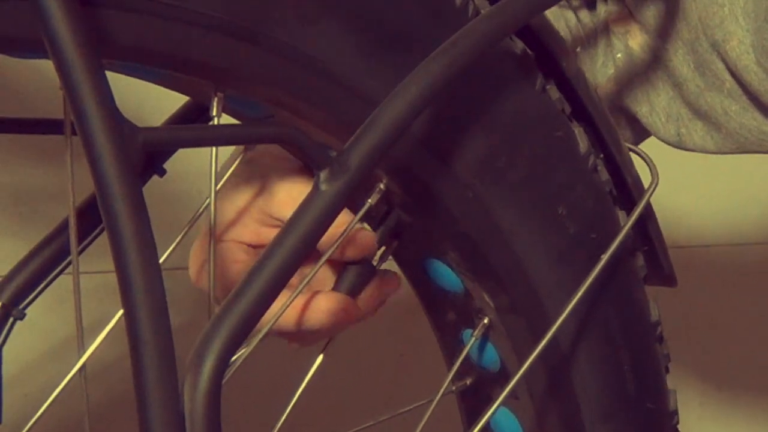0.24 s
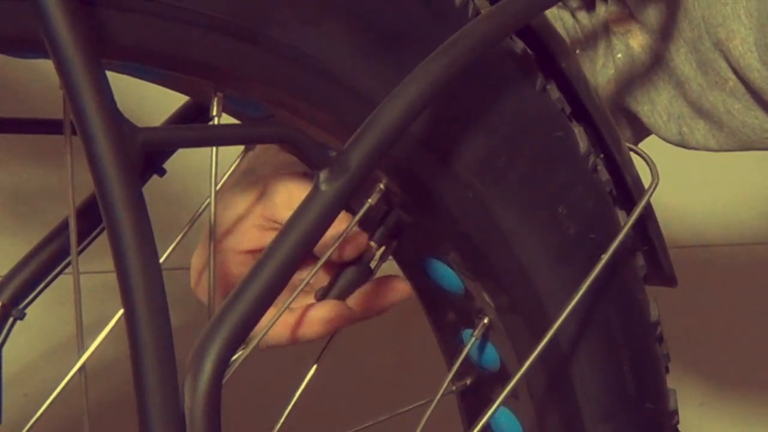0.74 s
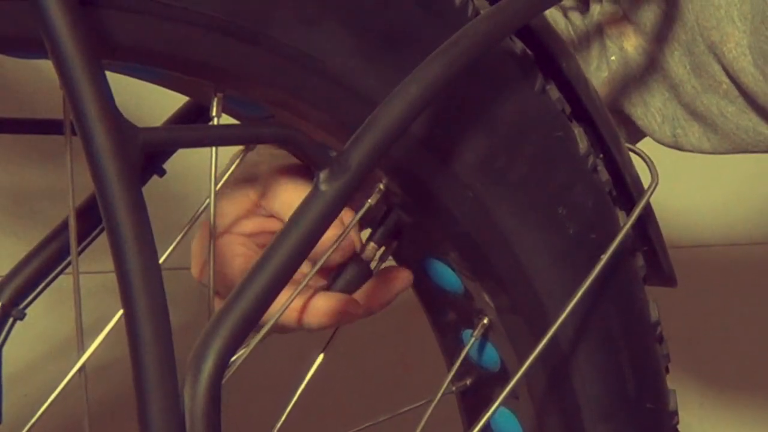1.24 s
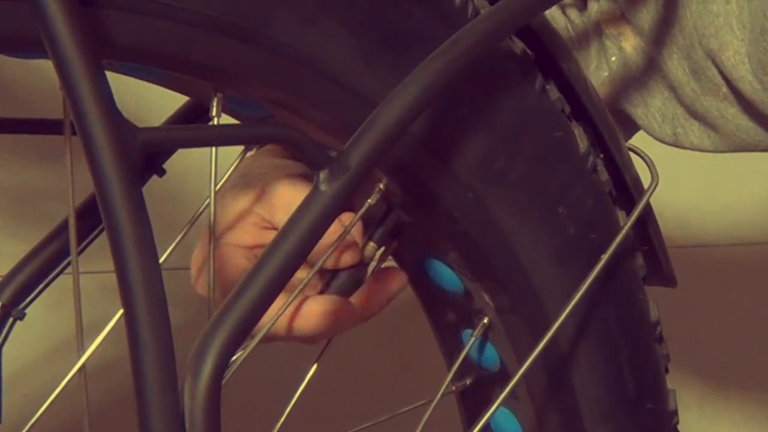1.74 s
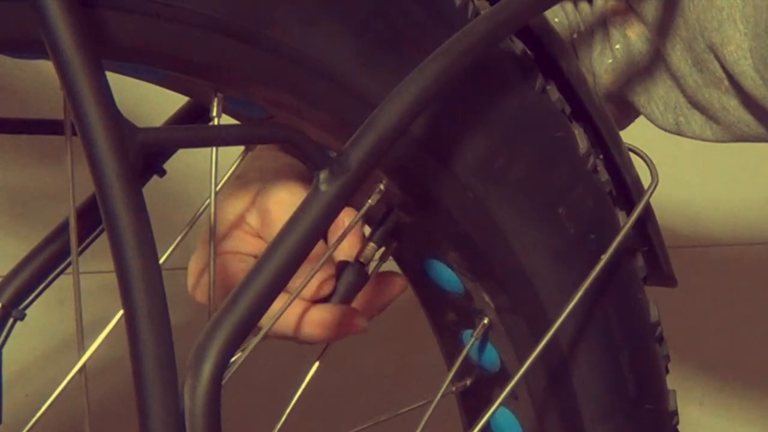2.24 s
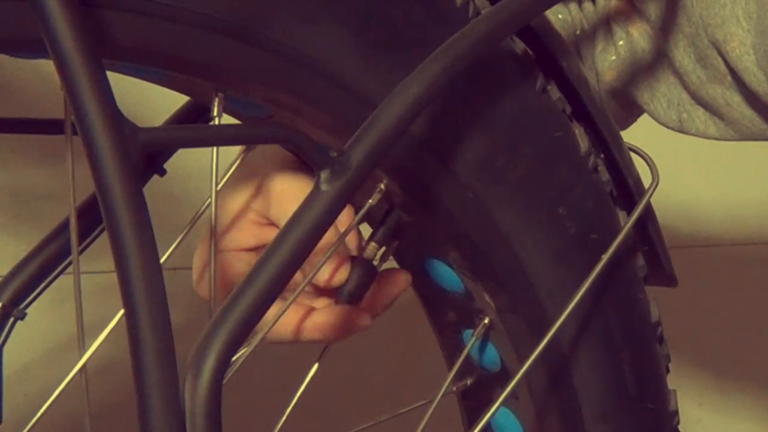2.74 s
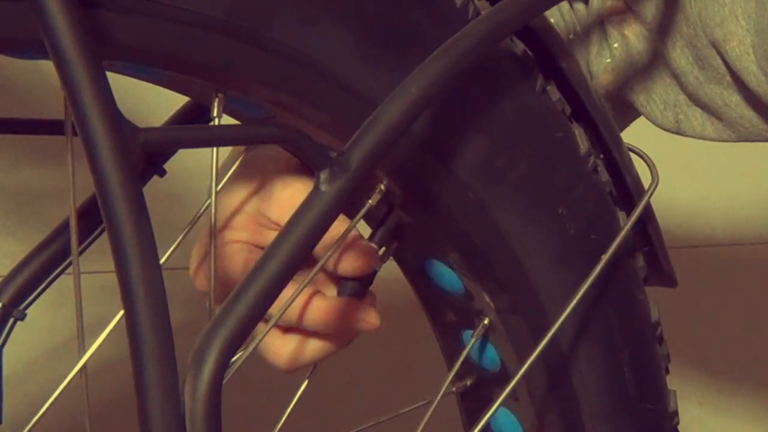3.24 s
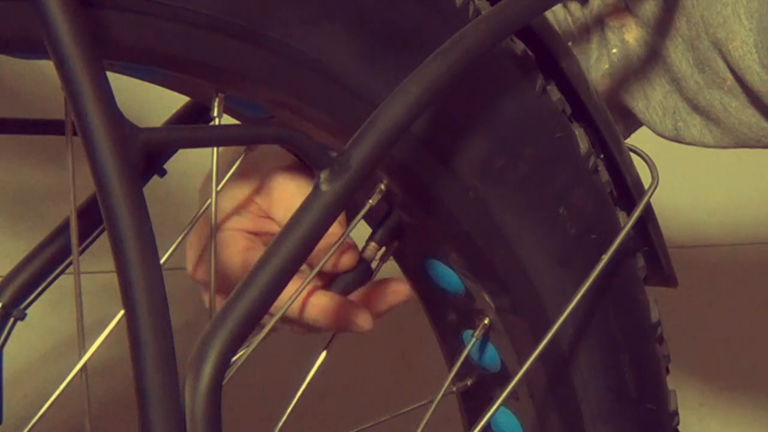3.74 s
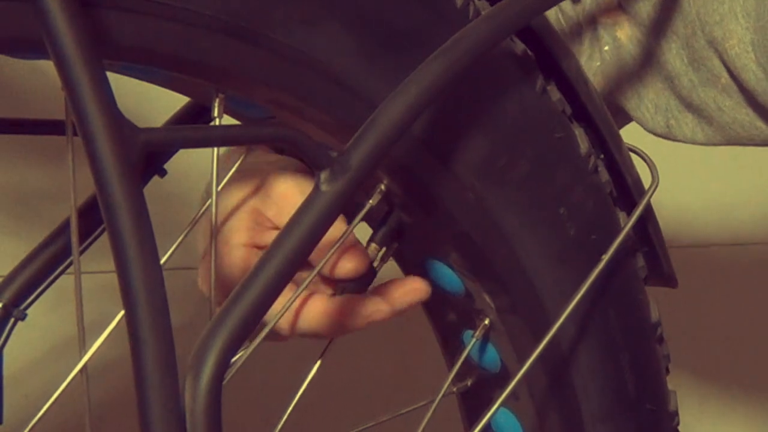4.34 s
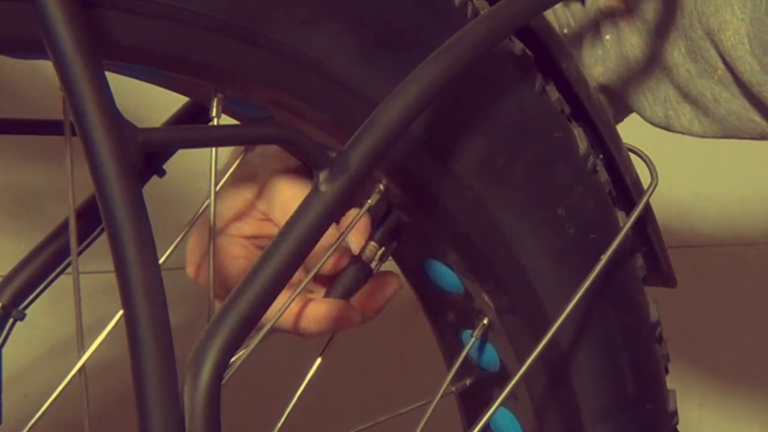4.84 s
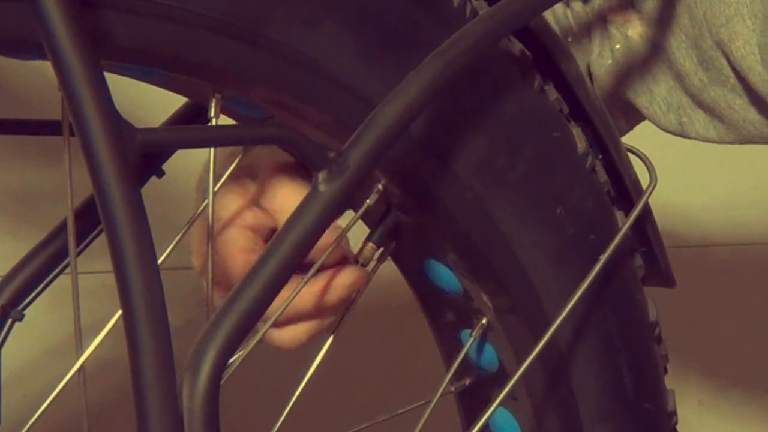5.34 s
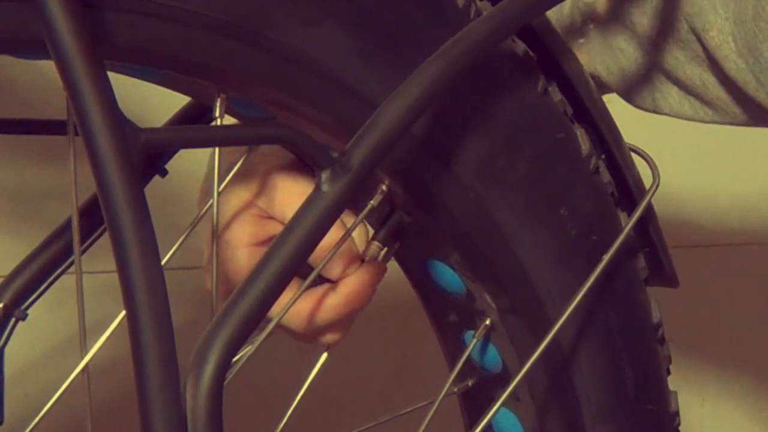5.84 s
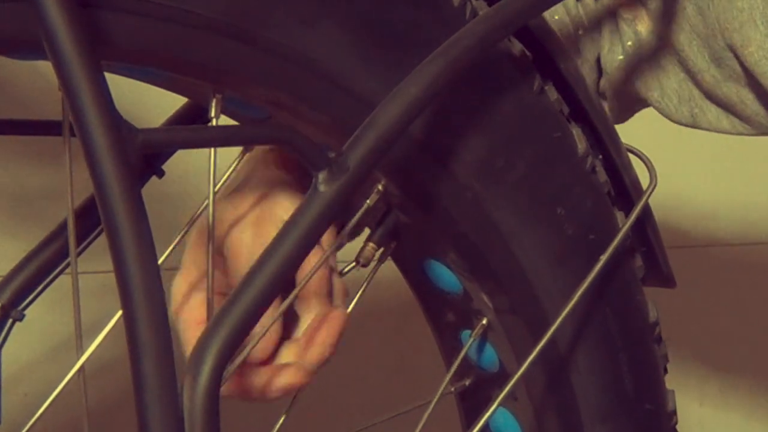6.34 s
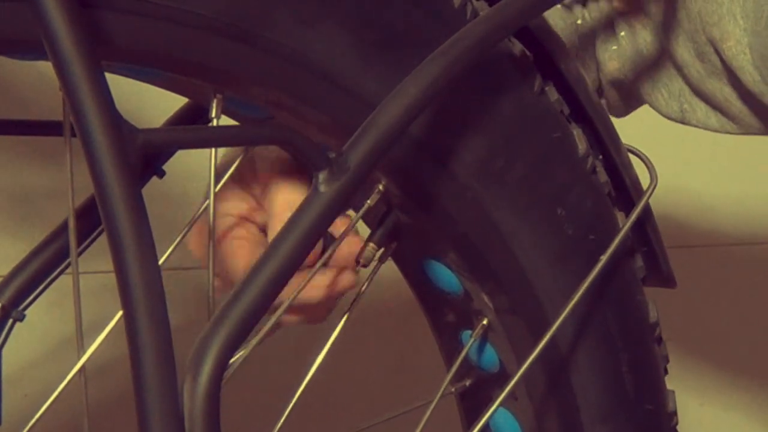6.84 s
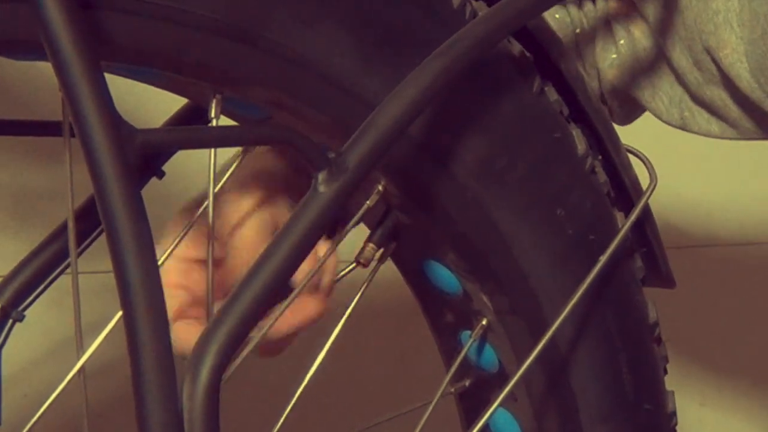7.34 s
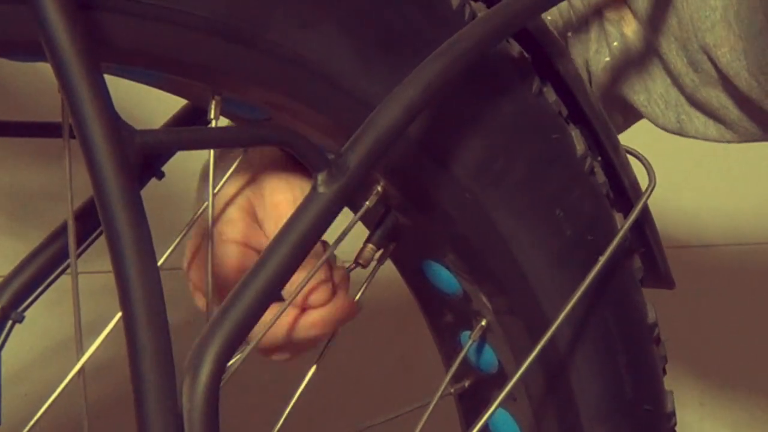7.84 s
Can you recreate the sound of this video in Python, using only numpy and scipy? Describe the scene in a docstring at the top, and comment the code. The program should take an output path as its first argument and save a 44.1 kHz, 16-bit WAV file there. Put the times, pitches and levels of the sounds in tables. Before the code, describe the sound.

Air escapes from a bicycle tire valve in a high, fluttering hiss with a faint breathy whistle while a small tool unscrews the core. A few light metal ticks and spoke taps sound over it. Past the middle, the jet splutters and shifts in tone as fingers get in its way, then grows strongest at the end. It is heard close up, over a faint low workshop rumble.

```python
"""Air escapes from a bicycle tire valve while fingers unscrew its core with a small tool.
From the start the jet hisses through the cavities of valve and tool, with a breathy stem note and two
edge tones, over a workshop's rumble. From 0.6 s the hand taps a spoke; from 1.5 s the tool ticks on the
valve. From 4.6 s the jet splutters where fingers deflect it, and at 5.3 s the tool comes off. Near 8 s
the rumble has faded and the freed jet is at its strongest."""
import sys
import numpy as np
from scipy import signal
from scipy.fft import rfft, irfft, next_fast_len
from scipy.io import wavfile
from scipy.ndimage import uniform_filter1d, map_coordinates

SR = 44100
rng = np.random.default_rng(int(sys.argv[2]) if len(sys.argv) > 2 else 0)


def generate_wav(signal):
    """Clip the signal to [-1, 1] and save it as 16-bit WAV at the path in sys.argv[1]."""
    frames = np.transpose(np.atleast_2d(signal))
    scaled = np.clip(frames, -1, 1) * 32767
    pcm = np.round(scaled).astype(np.int16)
    wavfile.write(sys.argv[1], SR, pcm)


N = 356239
FRAME, HOP = 256, 64  # samples

# slow envelopes: t/s, stem note level/dB, rumble level/dB
NOTE_AND_RUMBLE = [(0, -39, -52), (.3, -37.5, -50), (1.35, -36.5, -49), (1.62, -41.5, -55.5),
                   (2.72, -41.5, -54), (3.3, -39, -53), (4.12, -36.5, -49), (4.97, -39.5, -49.5),
                   (5.15, -43, -57), (5.92, -45.5, -56), (6.14, -44, -50.5), (6.48, -44, -46.5),
                   (6.6, -38, -51), (6.75, -42, -55.5), (7.1, -47, -55), (7.4, -45.5, -53),
                   (7.69, -41.5, -65), (7.94, -44.5, -73), (8.08, -52, -73)]
# the jet as the core comes loose: t/s, nominal level/dB of fizz, of cavity, of rush
JET_LEVELS = [(0, -37, -34, -43.5), (.25, -33, -30, -39.5), (1.15, -33, -31.5, -41),
              (1.3, -27.5, -26.5, -37.5), (1.5, -19.5, -25, -34), (1.72, -21.5, -21.5, -31.5),
              (1.77, -17, -30, -36), (2.22, -21.5, -28.5, -40.5), (2.27, -22, -33, -40),
              (2.53, -26, -31.5, -40), (2.6, -36.5, -37.5, -45), (3.0, -32, -32, -41.5),
              (3.44, -32, -36.5, -42), (3.52, -28.5, -29.5, -38.5), (4.4, -23, -25.5, -35.5),
              (4.5, -29, -30, -39), (4.58, -26, -26, -34), (4.85, -27, -23.5, -37),
              (5.0, -24.5, -23, -29.5), (5.26, -26, -20.5, -27.5), (5.33, -24.5, -29.5, -30.5),
              (5.58, -20, -27, -37), (5.8, -23.5, -32.5, -44.5), (6.0, -20, -28.5, -39.5),
              (6.13, -28, -33, -39), (6.28, -28.5, -37, -44.5), (6.52, -27.5, -35, -43.5),
              (6.9, -27.5, -30.5, -40.5), (7.07, -22, -29.5, -40.5), (7.3, -21.5, -29.5, -41),
              (7.4, -20.5, -25.5, -33.5), (7.5, -22, -23, -29.5), (7.77, -22.5, -20, -25),
              (7.85, -20, -26, -25.5), (8.08, -15, -18.5, -22.5)]
# tool or finger presses the core and chokes the flow: t/s, duration/s, nominal gain/dB
FLOW_CHOKES = [(.88, 0.086, -3), (1.36, 0.11, -6.5), (2.455, 0.042, -9), (3.04, .04, -3.5),
               (3.165, 0.042, -5.5), (3.44, 0.034, -5.5), (3.93, 0.093, -4.5), (4.47, .02, -8),
               (4.51, .03, -10), (4.68, 0.019, -5), (5.42, .11, -8), (5.488, .035, -4), (6.04, .015, -1),
               (6.728, .008, -4), (6.85, 0.06, -5.5), (6.945, 0.051, -4.5), (7.292, .012, -8),
               (7.335, 0.029, -12.5)]


def amp(db):
    """Amplitude ratio of a level in decibels."""
    return 10 ** (np.asarray(db) / 20)


def along(points, hz):
    """Interpolation of (f/Hz, value) points on a logarithmic frequency axis."""
    f, values = np.transpose(points)
    return np.interp(np.log(hz + 1), np.log(f + 1), values)


def curves(rows, t):
    """Linear interpolation in time of each column after the first."""
    times, *columns = np.transpose(rows)
    return [np.interp(t, times, column) for column in columns]


def plateaus(rows, t, rise_s=.005, fall_s=.0084):
    """Superposed smooth-edged pulses, one sum for each column after start and duration."""
    start, duration, *heights = np.array(rows).T[:, :, None]
    gate = (np.tanh((t - start) / rise_s) - np.tanh((t - start - duration) / fall_s)) / 2
    return [(height * gate).sum(0) for height in heights]


def wobble(rate, t):
    """Smooth random modulation: a spline through `rate` Gaussian knots a second."""
    return map_coordinates(rng.standard_normal(int(t[-1] * rate) + 4), [t * rate])


def filtered(x, response):
    """Linear filtering: the spectrum is multiplied by a frequency response."""
    size = next_fast_len(N + SR // 2)
    return irfft(rfft(x, size) * response(np.fft.rfftfreq(size, 1 / SR)), size)[..., :N]


def bell(hz, centre_hz, width_hz):
    """Lorentzian resonance curve, 1 at its centre; the width is taken at half height."""
    return 1 / (1 + (2 * (hz - centre_hz) / width_hz) ** 2)


def stereo_noise():
    """Partial coherence: sum and difference of two independent noises give two white channels."""
    # likeness of left and right: f/Hz, correlation coefficient
    correlation = [(40, -0.69), (70, -0.4), (130, 0.4), (290, 0.6), (640, .86), (1200, 0.96), (2300, .97),
                   (2800, 1), (12200, 1), (12900, 0.93)]

    def weights(hz):
        angle = np.arccos(np.clip(along(correlation, hz), -1, 1)) / 2
        return np.array([np.cos(angle), np.sin(angle)])

    mid, side = filtered(rng.standard_normal((2, N)), weights)
    return np.array([mid + side, mid - side])


def coloured_noise(power):
    """Stationary stereo noise of unit rms, shaped by a power spectrum."""
    noise = filtered(stereo_noise(), lambda hz: np.sqrt(power(hz)))
    return noise / noise.std()


def air_jet():
    """Source and filter: turbulence excites cavities whose resonances move with tool and fingers."""
    # four bands of jet noise, highest first: f/Hz, relative spectral level/dB
    fizz_band = [(5000, -46), (8500, -26), (9250, -23), (10000, -0.5), (10900, -1), (11400, 1.5),
                 (12100, 4.5), (13200, 0.5), (14600, -1), (15200, 0), (16000, 1.5)]
    cavity_band = [(4500, -21.5), (5300, -4), (6500, -5), (8000, -1.5), (9500, -2), (10500, -5.5)]
    rush_band = [(1000, -70), (1900, -7), (2400, 1), (3100, -2), (3900, 0.5), (4700, -1), (5600, -2),
                 (6500, 3.5), (8000, -65)]
    splutter_band = [(120, -70), (300, -20), (480, -4.5), (750, -2), (1200, 1.5), (1600, 1), (2200, 7),
                     (3200, -49)]
    # air thrown against tool and fingers: t/s, duration/s, nominal gain/dB of fizz, of rush, of splutter
    spurts = [(1.21, .015, 8, 6, 0), (1.93, 0.065, -2, 4, -4), (2.8, .025, 9, 1, 0),
              (2.98, 0.027, 2, 3.5, 9), (3.13, 0.028, 4, 1.5, -2), (3.7, .04, 5, 2, 0),
              (4.6, .09, -0.5, -0.5, 10.5), (4.707, .022, 3, 11, 23), (4.878, 0.084, 1.5, 8.5, 26),
              (4.975, 0.17, 1, 1, 16.5), (5.24, .03, 0.5, 5.5, 3), (5.37, 0.034, 7.5, 6, 10),
              (5.97, 0.058, 1.5, 12.5, 16), (6.058, 0.033, 7.5, 12, 4), (6.208, 0.014, 9, 12, 2),
              (6.1, .45, 0, 0, 3.5), (6.555, 0.031, 4, 16.5, 8), (6.583, .06, 5, 14, 11),
              (6.645, .085, 6.5, 19, 15), (6.74, .05, 7, 9, 6), (6.79, .035, 6, 15, 16),
              (6.91, .012, 8, 2, 2), (6.998, 0.029, 3, 11.5, 2), (7.03, 0.076, -0.5, 2, 11),
              (7.238, 0.057, -1.5, 1.5, 12), (7.365, .015, 3.5, 6.5, 13), (7.46, .37, 0, 0, 13),
              (7.83, .08, 0, 0, 8)]
    # gap between tool and valve: t/s, cavity f/Hz, fizz f/Hz, relative level/dB of the highest fizz
    gap = [(0, 8000, 12200, -1), (1.4, 8200, 12200, 2), (1.6, 6950, 12300, 6), (1.8, 7500, 12300, 4.5),
           (2.3, 8000, 12200, 4), (2.7, 8600, 12300, -1), (3.1, 8900, 12230, 1), (3.5, 8150, 12200, 0.5),
           (4.45, 8400, 12200, 0.5), (5.05, 8400, 12150, -12), (5.17, 6600, 12300, -3),
           (5.5, 7700, 11960, 1.5), (6.03, 7100, 11500, -1), (6.4, 7850, 11900, 1), (6.64, 8100, 11800, -7),
           (6.95, 7610, 11800, -0.5), (7.48, 6000, 11600, -2.5), (7.56, 7900, 11800, -4),
           (7.78, 8100, 11800, -7), (7.9, 6000, 11400, -7), (8.08, 7500, 11700, -7)]
    # hollow between fingers and tool: t/s, rush f/Hz, splutter f/Hz
    hollow = [(0, 2550, 750), (1.45, 2660, 750), (1.6, 4600, 900), (2.2, 3180, 890), (4.6, 2660, 600),
              (4.88, 2500, 800), (4.97, 3540, 550), (5.12, 3850, 800), (5.16, 5070, 1390),
              (5.34, 5030, 1400), (5.42, 3900, 500), (5.98, 2840, 1300), (6.5, 2800, 800),
              (6.7, 2930, 1200), (7.3, 3500, 600), (7.43, 2700, 1250), (7.6, 3100, 1200),
              (7.88, 3200, 1200), (7.96, 3900, 1500)]
    # stationary resonances of valve and tool: f/Hz, width/Hz, gain/dB
    bore = [(2190, 150, 2), (3200, 300, 2), (5600, 400, 2), (6700, 200, 3), (9640, 170, 2), (11650, 300, 2),
            (12300, 150, 2), (13200, 200, 2), (15600, 200, 3)]
    hz, t, spectrogram = signal.stft(stereo_noise(), SR, nperseg=FRAME, noverlap=FRAME - HOP)
    hz = hz[:, None]
    tool_on = t < 5.3

    fizz_db, cavity_db, rush_db = curves(JET_LEVELS, t)
    fizz_lift, rush_lift, splutter_lift = plateaus(spurts, t)
    cavity_lift = 0.49 * fizz_lift + 0.45 * rush_lift
    splutter_db = curves(NOTE_AND_RUMBLE, t)[0] - 11.5  # follows the stem note
    flutter = 0.89 * wobble(16, t) + 0.86 * wobble(35, t)  # unsteady flow, common to all bands
    flow_db = flutter + plateaus(FLOW_CHOKES, t)[0]

    cavity_hz, fizz_hz, top_db = curves(gap, t)
    rush_hz, splutter_hz = curves(hollow, t)
    top_shelf = amp(2 * top_db * np.clip((hz - 12800) / 1200, 0, 1))
    low_cut = 1 / (1 + (0.66 * rush_hz / (hz + 1)) ** 8)  # a small hollow holds no lows
    cavity_width_hz = np.where(tool_on, 840, 2200)
    bands = [(fizz_band, fizz_db + fizz_lift, top_shelf * (1 + amp(3.5) * bell(hz, fizz_hz, 1200))),
             (cavity_band, cavity_db + cavity_lift, 1 + amp(11.5) * bell(hz, cavity_hz, cavity_width_hz)),
             (rush_band, rush_db + rush_lift, low_cut * (1 + amp(5.5) * bell(hz, rush_hz, 1900))),
             (splutter_band, splutter_db + splutter_lift, 1 + amp(6.5) * bell(hz, splutter_hz, 470))]
    power = 0
    for spectrum, nominal_db, resonance in bands:
        shape = amp(2 * along(spectrum, hz)) * resonance
        flicker = 0.85 * wobble(20, t)
        turning = .6 * wobble(13, t) * tool_on  # the turning tool shakes each band's level
        level_db = 0.976 * (nominal_db + flow_db + flicker + turning)
        power = power + shape / shape.mean(0) * amp(2 * level_db)

    # the colour shimmers in random patches of frequency and time
    patches = uniform_filter1d(rng.standard_normal(power.shape), size=3, axis=0)
    patches = uniform_filter1d(patches, size=60, axis=1)
    spectrogram = spectrogram * np.sqrt(power) * amp(1.88 * patches / patches.std())
    jet = signal.istft(spectrogram, SR, nperseg=FRAME, noverlap=FRAME - HOP)[1][:, :N]

    def bore_response(f):
        gain_db = sum(db * bell(f, centre, width) for centre, width, db in bore) + 0.04
        bass_cut = f ** 3 / (f ** 3 + 300 ** 3)
        return amp(gain_db) * bass_cut

    return filtered(jet, bore_response)


def edge_tone(db, centre_hz, t, width_hz, waver_hz):
    """Quadrature modulation shifts slow noise up to a narrow band about a wandering centre."""
    in_phase, quadrature = filtered(rng.standard_normal((2, N)), lambda hz: bell(hz, 0, width_hz))
    phase = 2 * np.pi * np.cumsum(centre_hz + waver_hz * wobble(7, t)) / SR
    tone = in_phase * np.cos(phase) + quadrature * np.sin(phase)
    return amp(db + 2.4 * wobble(14, t)) * tone / tone.std()


def core_whistles():
    """Edge tones: air oscillates across the edges of the loosened core in two narrow bands."""
    # t/s, upper tone level/dB, lower tone level/dB, upper tone f/Hz
    tones = [(0, -37, -48, 8400), (.3, -36, -44, 8300), (1.15, -35, -40, 8380), (1.3, -29, -34, 8570),
             (1.52, -37, -26.5, 8230), (1.76, -39, -34, 8280), (2.2, -36, -36, 8470),
             (2.32, -42, -49, 8680), (2.67, -50, -53, 8600), (3.1, -39, -44, 8800), (3.43, -39, -50, 8480),
             (3.52, -35.5, -38, 8540), (4.4, -28, -37, 8470), (4.6, -31, -41, 8500),
             (5.05, -24.5, -35, 8470), (5.11, -28, -28, 8000), (5.17, -28, -30, 7000),
             (5.27, -28, -31, 7000), (5.32, -50, -50, 7000), (6.6, -55, -55, 8450), (6.66, -32, -36, 8450),
             (6.82, -32, -33, 8500), (6.87, -55, -55, 8450)]
    t = np.arange(N) / SR
    upper_db, lower_db, upper_hz = curves(tones, t)
    upper = edge_tone(upper_db, upper_hz, t, width_hz=290, waver_hz=70)
    lower = edge_tone(lower_db, 7530, t, width_hz=230, waver_hz=40)
    choke = np.interp(t, t[::HOP], plateaus(FLOW_CHOKES, t[::HOP])[0])
    return (upper + lower) * amp(1.1 * choke)  # the tones choke deeper than the jet


def stem_note():
    """Air-column resonance: like a blown tube, the stem selects one breathy note from the noise."""
    t = np.arange(N) / SR
    level_db = curves(NOTE_AND_RUMBLE, t)[0] + 0.4 * wobble(12, t)
    return amp(level_db) * coloured_noise(lambda hz: bell(hz, centre_hz=1796, width_hz=119) ** 1.22)


def workshop_rumble():
    """Superposition of low broadband noise and the tonal hums of distant machines."""
    # f/Hz, relative spectral level/dB
    spectrum = [(18, -56), (30, -18), (69, -12), (108, -1.5), (226, -3), (269, 0), (377, -5), (412, -5.5),
                (461, -11), (600, -8), (780, -5.5), (1320, -120)]
    # f/Hz, level/dB relative to the rumble, start t/s, end t/s
    hums = [(716, -8, 0, 5.1), (288, -2.5, 4.5, 4.75), (150, -3, 1.0, 1.23), (104, -5, 1.2, 1.7)]
    t = np.arange(N) / SR
    rumble = coloured_noise(lambda hz: amp(2 * along(spectrum, hz)))
    rumble = rumble * amp(0.37 * wobble(3.13, t) + 1.45 * wobble(12, t))
    thinned = filtered(rumble, lambda hz: amp(-4 / (1 + (hz / 120) ** 4)))
    rumble = rumble + np.clip((t - 4.5) / .3, 0, 1) * (thinned - rumble)  # the deepest part recedes
    for hz, db, start, end in hums:
        running = np.clip(np.minimum(t - start, end - t) / .08 + 1, 0, 1)
        envelope = running * amp(db + 1.5 * wobble(4.21, t))
        rumble = rumble + envelope * np.sin(2 * np.pi * hz * t + 0.67 * wobble(6, t))
    return amp(curves(NOTE_AND_RUMBLE, t)[1]) * rumble


def contact_noise(t, band_hz, t60_s):
    """A brief impact has a broad spectrum: band-limited noise with exponential decay."""
    noise = signal.lfilter(*signal.butter(2, band_hz, 'band', fs=SR), rng.standard_normal(len(t)))
    return amp(-60 * t / t60_s) * noise


def spoke_taps():
    """Free vibration: a spoke tapped by the hand rings briefly in damped, inharmonic modes."""
    # t/s, level/dB
    taps = [(0.5692, -22.5), (2.8614, -29), (3.051, -20.5), (3.2268, -14.5), (3.6591, -13.5),
            (4.153, -16.5)]
    # f/Hz, relative level/dB, T60/s
    modes = [(1164, -3.5, 0.089), (1503, -3.5, 0.087), (1900, -16, 0.045), (2410, -1.5, 0.069),
             (3070, -2, 0.096), (3930, 0, .05), (5800, -6, .03)]
    out, t = np.zeros(N + SR), np.arange(SR // 4) / SR
    attack = 1 - np.exp(-t / 0.00046)
    for start, db in taps:
        ring = sum(amp(level + rng.normal(0, 1.2) - 60 * t / t60) * np.sin(2 * np.pi * hz * t)
                   for hz, level, t60 in modes)
        tap = ring + 2 * contact_noise(t, band_hz=[900, 5000], t60_s=0.028)
        out[round(start * SR):][:len(t)] += amp(db) * tap / np.abs(tap).max() * attack
    return out[:N]


def tool_ticks():
    """Impact on the valve excites the tool's modes, the highest dying first; the frame rattles dully."""
    # t/s, level/dB, gain/dB of the low modes, relative rattle level/dB
    ticks = [(1.486, -15.5, -28, -2), (2.4425, -7, -42, -2), (2.5492, -10, -18, -2),
             (4.6918, -7.5, -33, -14), (7.419, -17, -31, 3)]
    # f/Hz, relative level/dB
    modes = [(560, 1), (950, -4), (1300, -2), (2220, -3), (2450, -0.5), (2820, -0.5), (3100, -3),
             (3700, -7), (5200, -3), (5800, -6)]
    out, t = np.zeros(N + SR), np.arange(SR // 4) / SR
    for start, db, low_db, rattle_db in ticks:
        ring = 0
        for hz, level in modes:
            t60 = .028 * min(1, 2600 / hz) ** 1.2
            phase_drift = np.cumsum(rng.normal(0, 0.18, len(t)))  # loose parts blur the ring
            mode_db = level + low_db * (hz < 1800) + rng.normal(0, 1.57)
            ring = ring + amp(mode_db - 60 * t / t60) * np.sin(2 * np.pi * hz * t + phase_drift)
        ring = ring * (1 - np.exp(-t / .0015))
        snap = ring / np.abs(ring).max() + amp(-5) * contact_noise(t, band_hz=[2500, 7000], t60_s=.012)
        tail = amp(-60 * t / 0.19) * rng.standard_normal(len(t))
        tail = signal.lfilter(*signal.butter(2, 3300, fs=SR), tail / np.linalg.norm(tail))
        rattle = amp(rattle_db) * signal.fftconvolve(snap, tail)[:len(t)]
        out[round(start * SR):][:len(t)] += amp(db) * (snap + rattle)
    return signal.lfilter(*signal.butter(2, 450, 'high', fs=SR), out[:N])  # small parts radiate no bass


def draught(start_s=5.0):
    """Turbulent pressure from the freed jet faintly buffets left and right in antiphase."""
    t = np.arange(0, N / SR, .005)
    flow_db = curves(JET_LEVELS, t)[0] + plateaus(FLOW_CHOKES, t)[0] + 3 * wobble(9, t)
    envelope = np.interp(np.arange(N) / SR, t, amp(flow_db - 48) * (t > start_s))
    pressure = filtered(rng.standard_normal(N), lambda hz: bell(hz, 0, width_hz=260))
    return np.array([[1], [-1]]) * envelope * pressure / pressure.std()


def scene():
    """Linear superposition: the pressures of all sources add."""
    sustained = air_jet() + core_whistles() + stem_note() + workshop_rumble()
    return sustained + tool_ticks() + spoke_taps() + draught()


def record(dry, top_hz=15750):
    """Band limiting, with a level difference between the channels that depends on frequency."""
    # f/Hz, left minus right level/dB
    balance = [(40, 0), (85, -4.5), (170, -6.5), (350, -4), (700, -2.8), (1300, .5), (2300, 1), (2800, 0),
               (12200, 0), (13200, 1.3)]
    side = np.array([[.5], [-.5]])
    return filtered(dry, lambda hz: amp(side * along(balance, hz)) * (hz < top_hz))


dry = scene()
out = record(dry)
generate_wav(out)
```